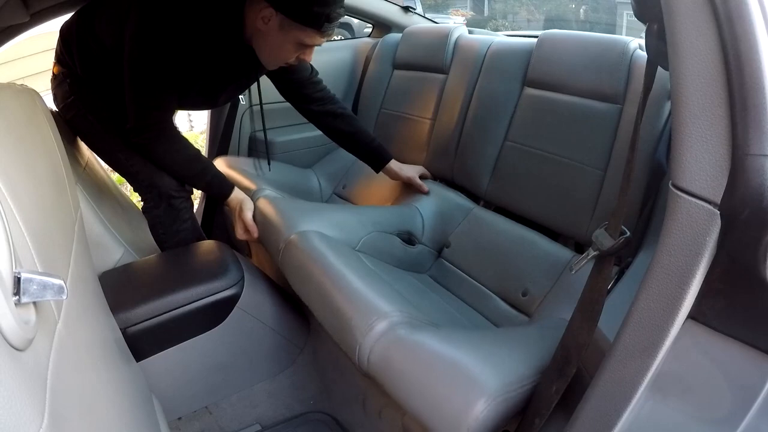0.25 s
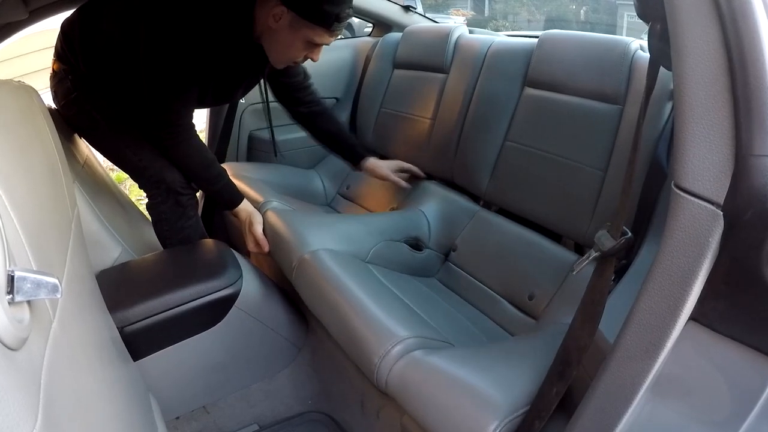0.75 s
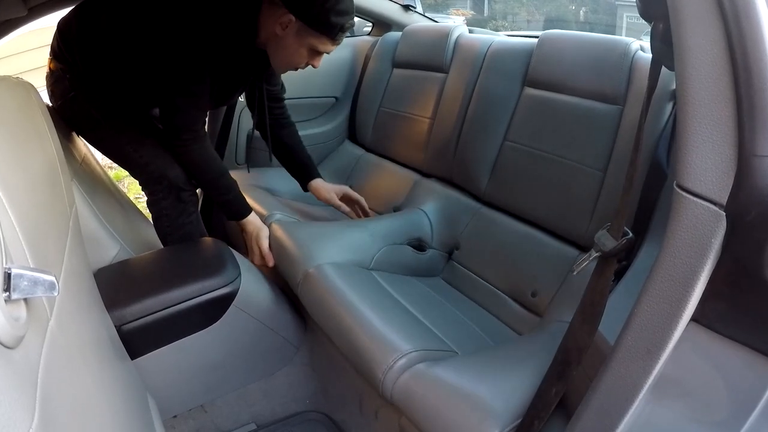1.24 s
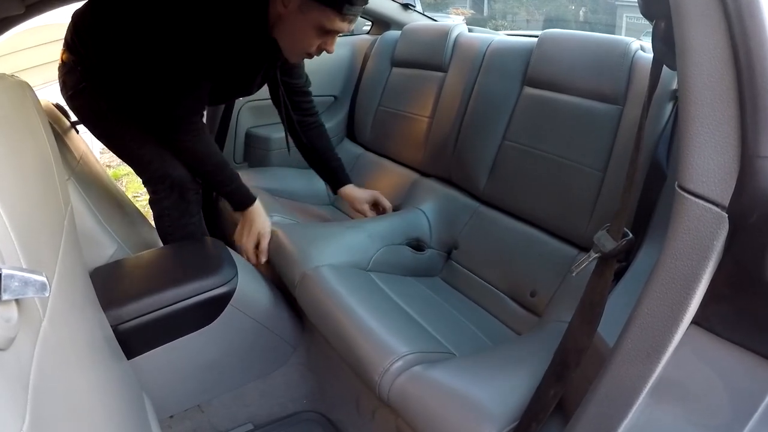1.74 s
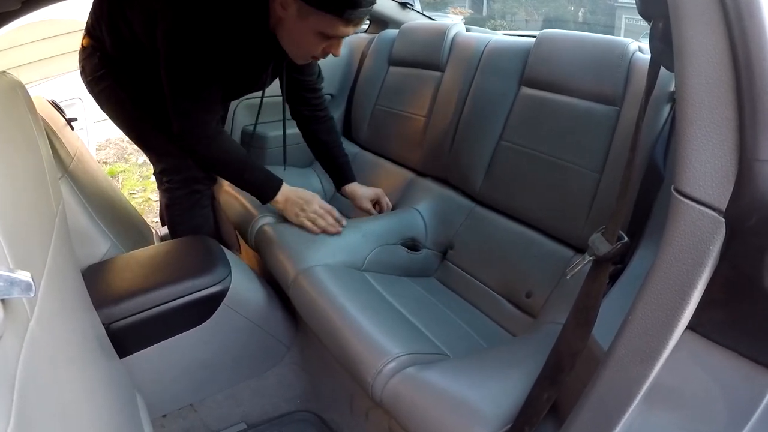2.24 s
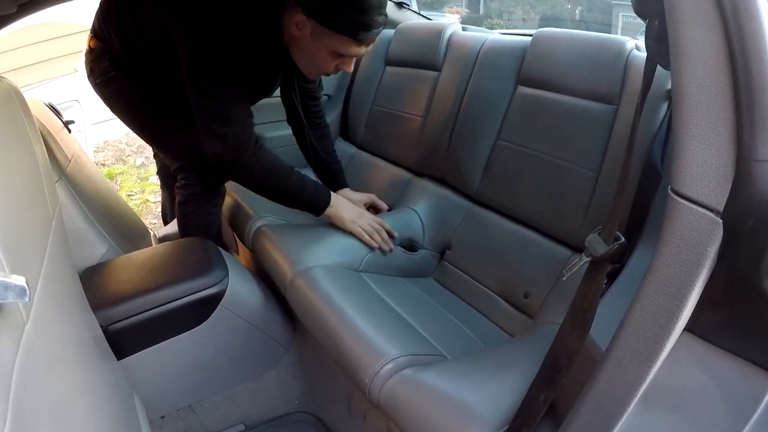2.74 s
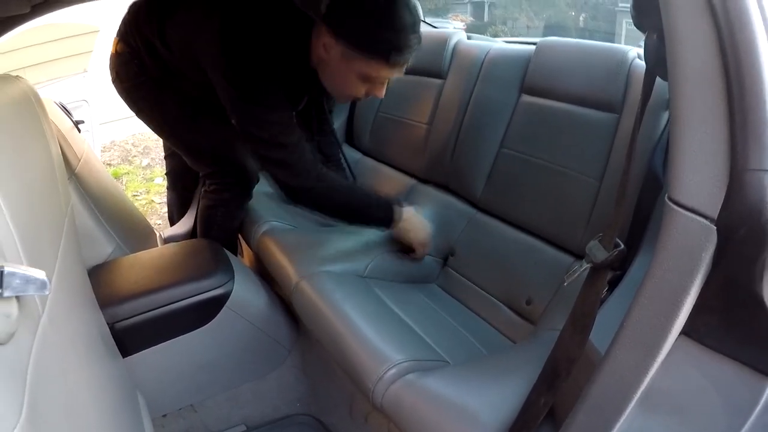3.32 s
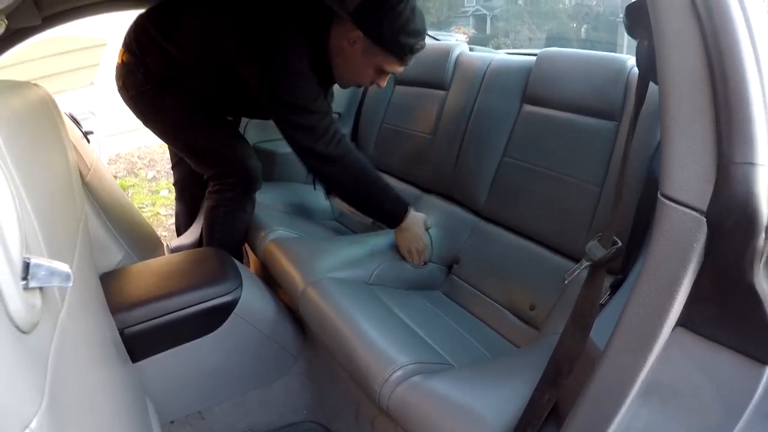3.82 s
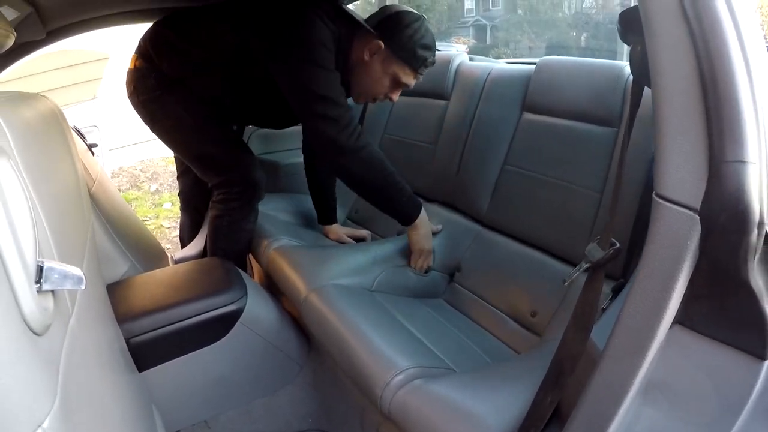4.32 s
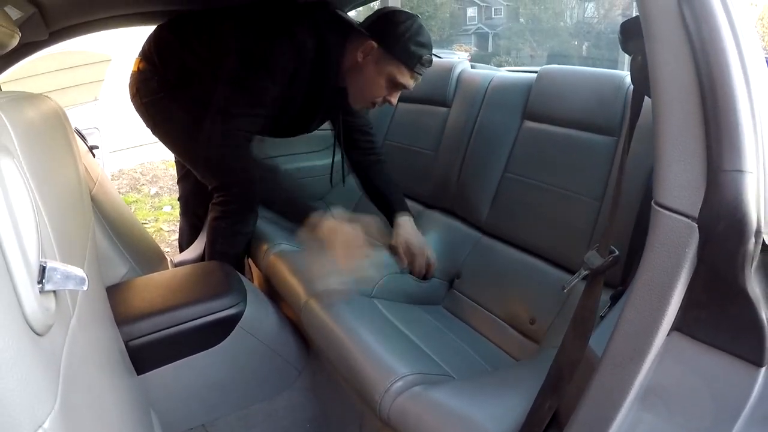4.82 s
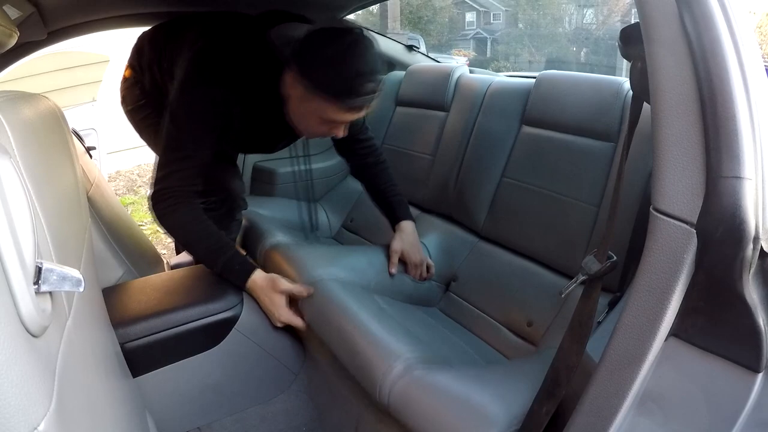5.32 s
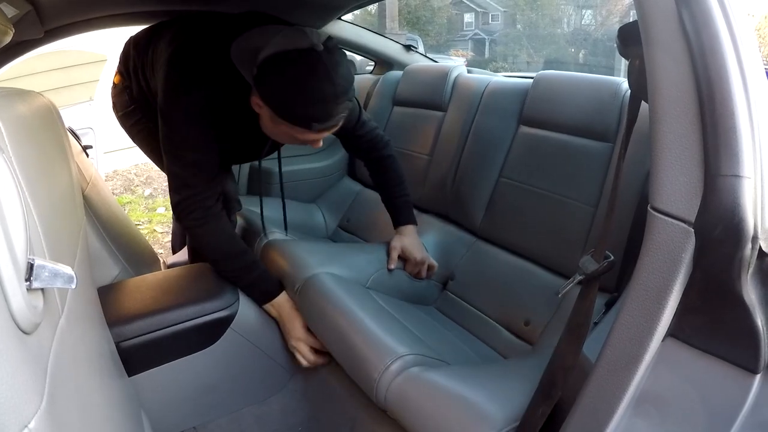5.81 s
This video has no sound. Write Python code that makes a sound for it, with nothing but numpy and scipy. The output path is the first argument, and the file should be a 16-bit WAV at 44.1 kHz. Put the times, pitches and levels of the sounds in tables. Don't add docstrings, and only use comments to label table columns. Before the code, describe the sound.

Close inside a parked car with an open door, hands push a leather seat cushion into place. Low rocking and booms mix with creaks, sleeve rustle and tiny ticks. A bird chirps outside as the frame knocks sharply. After a quieter stretch of rubbing, knocks, skids and thumps crowd together and a strap scrapes through its slot. The bird calls again, then final shoves bring more hard knocks. Close stereo microphone, short dull cabin reflections.

```python
import sys
import numpy as np
from scipy import signal
from scipy.fft import rfft, irfft, next_fast_len
from scipy.io import wavfile

SR = 44100
rng = np.random.default_rng(int(sys.argv[2]) if len(sys.argv) > 2 else 0)


def store_pcm(level_fs):
    pcm = np.round(np.clip(level_fs, -1, 1) * 32767).astype(np.int16)
    wavfile.write(sys.argv[1], SR, np.atleast_2d(pcm).T)


def undo_db(level):
    steps = np.asarray(level, float) / 20
    return 10 ** steps


N = 267422

# frequency in Hz, density in dB per Hz.
AIR_SPECTRUM = [(35, -23), (60, 0.5), (240, 2), (330, -17.5), (600, -20), (1300, -25), (1650, -30),
                (3000, -37), (6000, -42.5), (9000, -38.5), (12500, -35), (15000, -7)]
SWAY_SPECTRUM = [(11, -57), (18, 1.5), (43, -1.5), (110, -8), (140, -61), (240, -120)]
BOOM_SPECTRUM = [(45, -53), (75, -26), (110, -5.5), (150, 4), (200, -1.5), (255, 1.5), (290, -3.5),
                 (340, -12), (500, -18), (900, -17.5)]
CREAK_SPECTRUM = [(200, -22), (330, 2), (500, -4.5), (720, -5.5), (900, -10.5), (1650, -9.5), (2300, -14),
                  (3300, -21.5), (6000, -22.5)]
SWISH_SPECTRUM = [(1300, 12.5), (2200, 2), (3500, 3.5), (4800, 3.5), (6000, 5), (7500, 0.5), (8400, -5.5),
                  (11000, -10.5), (15000, 1.5)]
AIR_DB = -36.5

# start in seconds, length in seconds, top in Hz, level in dB.
ARCHES = [
    (1.28, 0.11, 5000, -50.5),
    (1.452, 0.11, 5240, -50.5),
    (1.963, 0.087, 5300, -53.5),
]
# start in seconds,
# length in seconds, from in Hz, to in Hz, level in dB.
GLIDES = [(1.108, 0.053, 5700, 7100, -51), (1.12, 0.11, 4360, 4400, -53), (1.3, 0.06, 8300, 7450, -58),
          (1.465, .1, 5180, 5160, -56), (1.302, 0.079, 4600, 4400, -57.5), (1.48, .045, 7600, 7300, -58),
          (4.289, 0.063, 5160, 6400, -44), (4.316, 0.065, 6880, 6880, -46), (4.308, 0.02, 5600, 5000, -42),
          (4.309, 0.09, 3700, 3780, -36.5), (4.416, 0.032, 3830, 3600, -51.5),
          (4.458, 0.045, 3800, 3760, -49), (4.39, 0.205, 3800, 3790, -58), (4.61, 0.058, 3500, 3920, -49.5),
          (4.648, 0.051, 3600, 3710, -51), (4.623, 0.034, 6730, 6870, -61), (4.745, .13, 4370, 4350, -56),
          (4.9, 0.093, 4400, 4330, -54), (4.78, .06, 1720, 1900, -60)]
ARCH_FOOT_HZ, ARCH_TOP_SHARE, GLIDE_SHARE = 4410, 0.3, 0.35
LOUDEST_SHARE, ONSET_DB, FADE_DB = 0.33, -4, -28
ARCH_HARSHNESS, GLIDE_HARSHNESS = 0.8, 0.42

# start in seconds, peak in dB, ring in Hz.
TICKS = [(0.349, -47, 5200), (0.372, -46, 4230), (0.406, -47.5, 3900), (0.416, -48, 4000),
         (0.458, -41, 800), (0.47, -50, 4300), (0.484, -40, 1000), (0.54, -50, 5400), (0.595, -49, 4100),
         (1.401, -47, 905), (2.691, -50, 800), (3.524, -31, 1670), (3.543, -30, 1760), (3.58, -30.5, 1080),
         (3.614, -32, 1700), (3.662, -35, 1900), (3.674, -36, 2400), (3.688, -43, 1212), (3.727, -46, 1030),
         (3.777, -38, 2030), (3.797, -32, 2010), (3.886, -29, 2360), (3.945, -31, 2300), (3.999, -41, 1120),
         (4.17, -43, 690), (4.408, -37.5, 4530), (4.57, -37.5, 3060), (4.659, -51, 6500),
         (4.78, -32.5, 1740), (5.241, -31.5, 654.6), (5.326, -38.5, 700), (5.385, -37, 895),
         (5.619, -32, 1520), (5.821, -41.5, 670), (5.908, -29.5, 724), (6.024, -39, 795)]
TICK_CYCLES, TICK_SCRAPE_S, TICK_CLICK_DB = 18, 0.0023, -16

# time in seconds, slips per second, level in dB, pitch ratio (tension).
STRAP = [
    (3.64, 42, -50, .94),
    (3.7, 40, -49, .96),
    (3.76, 45, -48, .975),
    (3.82, 60, -47, .99),
    (3.88, 100, -46, 1.0),
    (3.95, 130, -46, 1.01),
    (3.99, 130, -65, 1.01),
]
# frequency in Hz, T60 in seconds, level in dB.
SLOT_MODES = [(2050, .01, -5), (2480, .012, -4), (3450, .018, 0)]

# start in seconds, length in seconds, level in dB, dullness in Hz.
SKIDS = [(0.127, 0.087, -48.5, 2430), (0.619, 0.057, -46, 4100), (4.551, 0.095, -50, 3460),
         (1.118, 0.039, -36.5, 1100), (1.416, 0.17, -53.5, 1180), (1.623, 0.023, -27, 3150),
         (2.726, 0.029, -43, 5140), (3.08, 0.11, -39.5, 2260), (3.336, 0.033, -37.5, 3300),
         (3.483, 0.014, -39.5, 2000), (3.894, 0.073, -38.5, 3180), (4.15, 0.13, -35.5, 2120),
         (4.77, 0.076, -47, 2350), (5.47, 0.039, -36.5, 2600), (6.03, 0.056, -36.5, 3050),
         (0.259, 0.03, -42, 794), (3.371, 0.021, -37, 1490), (3.56, 0.036, -43, 2510),
         (3.846, 0.044, -42.5, 2500)]

# centre in seconds, peak in dB, frequency in Hz, width in seconds.
LURCHES = [(0.772, -18, 60, 0.017), (0.846, -22.5, 65, 0.014), (0.912, -17, 259, 0.0068),
           (1.053, -16, 55.4, 0.017), (1.06, -13.5, 180, 0.008), (1.107, -15.5, 42, 0.028),
           (1.234, -19.5, 50, 0.016), (1.489, -26, 57, 0.016), (1.64, -13, 260, 0.015),
           (1.889, -23, 55.3, 0.029), (2.953, -16.5, 205, 0.0097), (3.082, -17.5, 57, 0.025),
           (3.415, -26.5, 55, 0.017), (3.511, -19, 179, 0.011), (3.653, -12, 58.7, 0.025),
           (3.744, -13, 61.7, 0.018), (3.862, -20, 64, 0.017), (3.894, -16.5, 164, 0.0094),
           (3.924, -11.5, 47, 0.026), (3.961, -11, 191, 0.012), (3.983, -17, 42.7, 0.029),
           (4.059, -25, 43, 0.02), (4.096, -14.5, 215, 0.01), (4.134, -22, 220, 0.0037),
           (4.164, -17.5, 187, 0.013), (4.221, -20, 175, 0.0071), (4.22, -10.5, 49, 0.028),
           (4.267, -14, 220, 0.0074), (4.465, -15, 203, 0.0082), (5.022, -21.5, 71, 0.023),
           (5.155, -18, 55.6, 0.018), (5.216, -21.5, 58, 0.035), (5.356, -12.5, 254, 0.01),
           (5.396, -20.5, 66, 0.014), (5.497, -17, 180, 0.0095), (5.516, -18, 61.4, 0.018),
           (5.66, -21, 68, 0.014), (5.675, -13, 214, 0.0063)]
LURCH_DB, LURCH_TAIL_RATIO = -2.5, 1.3

# start in seconds, peak in dB, ring in Hz, thud in dB.
KNOCKS = [(0.161, -30, 470, 1.5), (0.254, -29.5, 450, 1), (0.639, -32.5, 306, 2.5), (0.712, -32, 520, 0.5),
          (0.903, -20, 775, -4), (1.021, -31.5, 630, -9), (1.048, -27.5, 527, 2.5), (1.24, -35.5, 636, 7.5),
          (1.601, -16.5, 830, -9), (1.624, -20.5, 600, -2), (2.472, -26.5, 620, -4),
          (2.526, -32.5, 633, -4), (3.103, -32.5, 604, 4), (3.347, -23.5, 1830, -13.5),
          (3.368, -19, 990, -19), (3.446, -34.5, 2700, -24), (3.469, -19, 1870, -15),
          (3.494, -24.5, 710, -6), (3.57, -36, 2330, 4), (3.631, -26.5, 2060, -5), (3.91, -28, 633, -15),
          (4.11, -22, 614, -2.5), (4.342, -31, 616, 4), (4.459, -24, 603, -0.5), (5.224, -34.5, 587, -4.5),
          (5.307, -41, 1840, -25.5), (5.345, -17.5, 770, -6), (5.654, -16.5, 580, -13),
          (5.776, -35, 1830, -2), (6.058, -16, 1590, -38)]
# start in seconds, peak in dB, thud in dB.
BUMPS = [(0.479, -47, 8), (0.822, -55, 23), (1.127, -38.5, 13), (1.452, -39.5, 7), (1.491, -40.5, 14),
         (1.691, -43.5, 12.5), (2.949, -33.5, 9.5), (3.221, -36, 7), (3.412, -40, 12), (3.541, -33, -2),
         (4.091, -28.5, 5), (4.483, -27, 4), (5.856, -36, 5.5)]
# start in seconds, peak in dB, ring in Hz, crack in dB.
SNAPS = [(0.625, -46, 500, 9), (1.413, -37.5, 620, -7), (1.801, -41.5, 653, -1), (2.085, -40.5, 540, 0),
         (2.428, -37, 640, -8), (2.585, -37.5, 580, 1), (2.72, -37, 490, 11), (3.075, -32, 494, 3.5),
         (3.309, -29, 1320, 14.5), (4.984, -48, 584, -22), (5.485, -27, 710, -4), (5.574, -37.5, 890, 16),
         (6.05, -31, 1130, 15.5)]
# time in seconds, left over right in dB.
HAND = [(0.0, 1), (1.05, -0.5), (1.6, -4.5), (2.1, 9.5), (2.9, -18), (3.1, 10), (3.3, -10), (3.65, -6.5),
        (3.9, -2), (4.5, -1.5), (5.35, -3.5), (6.06, -7.5)]
KNOCK_CRACK_DB, BUMP_RING_HZ, BUMP_CRACK_DB, SNAP_THUD_DB = -18.5, 580, -15, -8
CABIN_T60_S, CABIN_CUT_HZ = 0.072, 5500

# time in seconds, hand pressure as creak in dB, leaned weight as sway in dB.
EFFORT = [(0.0, -57, -63), (0.4, -56, -48), (0.74, -49, -31), (0.86, -60.5, -36.5), (1.1, -42, -29.5),
          (1.25, -64, -29), (1.55, -50, -48), (1.87, -56.5, -33), (2.3, -49.5, -42.5), (2.8, -48.5, -54),
          (3.21, -41.5, -31.5), (3.3, -48, -40.5), (3.57, -41, -24.5), (3.8, -47.5, -25.5),
          (4.32, -38.5, -32.5), (4.6, -55, -32), (5.45, -41.5, -40.5), (6.06, -43.5, -33.5)]
# peak in seconds, fall of 10 dB in seconds, sway in dB, boom in dB.
SHOVES = [(0.0, 1.05, -35, -70), (0.18, 0, -28, -31.5), (0.0, -0.03, -25.5, -63), (0.3, 0, -36, -38),
          (0.66, -0.03, -42, -33), (0.759, 0.17, -27, -34), (1.09, 0.1, -23, -28), (1.22, 0.09, -33, -32),
          (1.47, 0.07, -26.5, -28), (1.62, 0.13, -55, -33), (1.75, -0.1, -32, -47),
          (1.89, 0.13, -32, -41.5), (2.09, 0.1, -44, -37), (2.48, 0.3, -38, -34.5),
          (2.95, 0.31, -57, -37.5), (3.08, 0.12, -31, -31), (3.49, 0.47, -45.5, -31),
          (3.659, .04, -23, -33), (3.75, 0.06, -34, -32), (3.889, 0.07, -29, -21.5),
          (3.968, 0.04, -28, -38), (4.15, 0.21, -36, -24), (4.243, 0.05, -20, -20), (4.48, -0.6, -49, -46),
          (4.85, -0.22, -40, -35.5), (5.1, 0.66, -30, -43), (5.22, 0.06, -30, -30.5),
          (5.381, 0.07, -34, -27.5), (5.497, 0.09, -27.5, -27), (5.9, 0.1, -38, -32),
          (5.67, 0.06, -25.5, -28)]
# fastest in seconds, rise and fall of 10 dB in seconds, swish in dB.
STROKES = [(0.0, .05, 0, -56.5), (0.17, 0.1, -0.14, -53), (0.66, 0, -1, -60.5), (0.91, 0.13, -0.2, -54),
           (1.06, 0.09, 0.2, -46.5), (1.15, 1, -6, -68), (1.48, 0.2, 2, -56), (1.647, 0.0272, 0.04, -34.5),
           (1.96, 0.06, 0, -45.5), (2.3, 0.1, 0.2, -48), (2.73, 0.01, 0.22, -46.5),
           (2.88, -0.05, 0.07, -47.5), (3.11, -0.2, 0, -44.5), (3.31, .015, 0.1, -39),
           (3.47, -0.37, -1, -48), (3.58, -1.13, -0.33, -39), (3.63, -0.55, -0.46, -30),
           (3.97, 0.07, 0.02, -41.5), (4.12, -7, 0.2, -55), (4.22, 0, 0.18, -43.5), (4.33, 0.1, 0.07, -47),
           (4.47, 0.17, 0.07, -47.5), (4.64, 0, 0.15, -49), (4.83, -2.05, -0.6, -43),
           (5.17, 0.33, 3.5, -49.5), (5.49, 0.03, .1, -42.5), (5.91, -0.1, 2, -45.5),
           (5.59, -0.14, -0.15, -43), (5.65, 0, -0.05, -35), (6.04, 0.1, -2, -45), (6.06, 0.05, .05, -41)]
SHOVE_RISE_RATIO = 0.57
BOOM_UNDER_SWAY_DB, SWISH_UNDER_CREAK_DB = -8, -25

# frequency in Hz, lead of left in radians.
PORT_PHASE = [(200, .2), (400, .3), (650, 1.2), (950, 1.7), (1640, 1.5), (2240, 1.3), (3530, 0.0),
              (5700, 0.2), (7600, -1.9), (8800, -1.6), (10200, 0.3), (13700, .4), (14200, 3.2)]
# frequency in Hz, left over right in dB.
PORT_TILT = [(60, -1.5), (110, -1.5), (200, -3.5), (380, -1.5), (700, -2.5), (1280, -1.5), (2370, -0.5),
             (4370, 0.5), (8050, -3), (14900, -1)]
MIC_TOP_HZ = 11700


def rms_one(x):
    return x / np.sqrt(np.mean(x ** 2) + 1e-20)


def peak_one(x):
    return x / (np.max(np.abs(x)) + 1e-12)


def add(out, start_s, sound):
    i = int(start_s * SR)
    out[:, i:i + sound.shape[1]] += sound[:, :N - i]


def in_time(rows):
    s, *columns = np.transpose(rows)
    return [np.interp(np.arange(N) / SR, s, c) for c in columns]


def at_hz(points, hz):
    table_hz, value = np.transpose(points)
    return np.interp(np.log(hz), np.log(table_hz), value)


def low_pass(x, order, hz):
    return signal.sosfilt(signal.butter(order, hz, fs=SR, output="sos"), x)


def band_pass(x, order, low_hz, high_hz):
    return signal.sosfilt(signal.butter(order, [low_hz, high_hz], "band", fs=SR, output="sos"), x)


def drift(rate_hz):
    r = np.exp(-80 * np.pi * rate_hz / SR)
    slow = signal.lfilter([1], [1, -2 * r, r * r], rng.standard_normal(N // 40 + 2002))[2000:]
    return np.interp(np.arange(N) / 40, np.arange(len(slow)), rms_one(slow))


def grains(per_s, spread_db, clump_db):
    size_db = spread_db * np.minimum(rng.exponential(1, (2, N)), 4)
    sizes = undo_db(size_db) * rng.choice([-1, 1], (2, N))
    born = rng.random((2, N)) < per_s * undo_db(clump_db * drift(25)) / SR
    return sizes * born + 1e-9


def pair(two, alike):
    alike = np.clip(alike, 0, 1)
    return np.sqrt(1 + alike) * two[0] + np.sqrt(1 - alike) * two[1] * np.array([[1], [-1]])


def coloured(two, spectrum, patchy_db, alike):
    size = next_fast_len(N)
    octave = np.log2(np.arange(size // 2 + 1) * SR / size + 1)
    shaped = rfft(two, size) * undo_db(at_hz(spectrum, 2 ** octave))
    out = 0
    for centre in np.arange(np.log2(spectrum[1][0]), np.log2(spectrum[-1][0])):
        overlap = np.clip(1 - np.abs(octave - centre), 0, 1)
        out = out + irfft(shaped * overlap, size)[:, :N] * undo_db(patchy_db * drift(5.9))
    return rms_one(pair(out, alike))


def ring(x, hz, t60_s):
    r, w = undo_db(-60 / (t60_s * SR)), 2 * np.pi * hz / SR
    return signal.lfilter([0, np.sin(w)], [1, -2 * r * np.cos(w), r * r], x)


def sliding_ring(x, hz, t60_s):
    turn = np.exp(2j * np.pi * np.cumsum(hz) / SR)
    return np.real(turn * signal.lfilter([1], [1, -undo_db(-60 / (t60_s * SR))], x / turn))


def swells(rows):
    t = np.arange(0, N + 64, 64)[None] / SR
    s, rise_s, fall_s, peak_db = np.transpose(rows)[:, :, None]
    before = (s - t) / np.maximum(rise_s, 1e-3)
    after = (t - s) / np.maximum(fall_s, 1e-3)
    level = undo_db(peak_db - 10 * np.maximum(before, after))
    return np.interp(np.arange(N) / SR, t[0], np.sqrt(np.sum(level ** 2, axis=0)))


def air():
    noise = rng.standard_normal((2, N))
    return undo_db(AIR_DB - 4.5) * coloured(noise, AIR_SPECTRUM, patchy_db=1.0, alike=.42)


def notes():
    paths = []
    for s, length_s, top_hz, db in ARCHES:
        path_hz = [ARCH_FOOT_HZ, top_hz, 1.04 * ARCH_FOOT_HZ, ARCH_FOOT_HZ]
        paths.append((s, length_s, [0, ARCH_TOP_SHARE, 2 * ARCH_TOP_SHARE, 1], path_hz, db))
    for s, length_s, from_hz, to_hz, db in GLIDES:
        paths.append((s, length_s, [0, GLIDE_SHARE, 1], [from_hz, to_hz, to_hz], db))
    share = np.linspace(0, 1, 21)
    swell_db = np.interp(share, [0, LOUDEST_SHARE, 2 * LOUDEST_SHARE, 1], [ONSET_DB, 0, -4.5, FADE_DB])
    return [np.transpose([s + length_s * share, np.interp(share, at, hz), db + swell_db])
            for s, length_s, at, hz, db in paths]


def bird():
    dry = np.zeros((1, N))
    flutter = rms_one(low_pass(rng.standard_normal(N), 2, 330))
    for k, note in enumerate(notes()):
        s, hz, level_db = np.transpose(note)
        t = np.arange(s[0], s[-1], 1 / SR)
        harsh = ARCH_HARSHNESS if k < len(ARCHES) else GLIDE_HARSHNESS
        voice = np.sqrt(1 - harsh ** 2) + harsh * flutter[(t * SR).astype(int)]
        edge = np.clip(np.minimum(t - s[0], s[-1] - t) / 0.0023, 0, 1)
        tone = np.sin(2 * np.pi * np.cumsum(np.interp(t, s, hz)) / SR)
        gain = np.sqrt(2) * edge * undo_db(np.interp(t, s, level_db) + 1.0)
        add(dry, s[0], (gain * voice * tone)[None])
    scatter = rng.standard_normal((2, 6000)) * np.exp(-np.arange(6000) / SR / 0.014)
    scatter /= np.sqrt(np.sum(scatter ** 2, axis=1))[:, None]
    return 0.69 * dry + 0.84 * signal.fftconvolve(dry, scatter, axes=1)[:, :N]


def cabin(x):
    t = np.arange(int(.2 * SR)) / SR
    tail = rng.standard_normal((2, len(t))) * undo_db(-60 * t / CABIN_T60_S) * (t > .002)
    tail = low_pass(tail, 1, CABIN_CUT_HZ)
    tail /= np.sqrt(np.sum(tail ** 2) / 2)
    return signal.fftconvolve(x.mean(axis=0, keepdims=True), tail, axes=1)[:, :N]


def ticks():
    out, t = np.zeros((2, N)), np.arange(int(.05 * SR)) / SR
    for s, peak_db, hz in TICKS:
        scrape = pair(rng.standard_normal((2, len(t))), 1.0) * np.exp(-t / TICK_SCRAPE_S)
        click = band_pass(scrape, 1, .4 * hz, min(3 * hz, 14000))
        pan_db = np.interp(s, *np.transpose(HAND)) / 4
        sound = peak_one(ring(scrape, hz, TICK_CYCLES / hz)) + undo_db(TICK_CLICK_DB) * peak_one(click)
        add(out, s, undo_db(peak_db) * sound * undo_db([[pan_db], [-pan_db]]))
    return out


def strap():
    per_s, level_db, tension = in_time(STRAP)
    start_s, end_s = STRAP[0][0], STRAP[-1][0]
    moving = np.abs(np.arange(N) / SR - (start_s + end_s) / 2) < (end_s - start_s) / 2
    slips = np.diff(np.floor(np.cumsum(per_s * undo_db(1.2 * drift(24))) / SR), prepend=0)
    scratch = signal.lfilter([1], [1, -.985], slips) * rng.standard_normal((2, N))
    scratch = scratch + .05 * rng.standard_normal((2, N))
    rung = sum(undo_db(db) * sliding_ring(scratch, hz * tension, t60_s) for hz, t60_s, db in SLOT_MODES)
    return moving * undo_db(level_db) * rms_one(pair(rung, 0.28))


def skids():
    out = np.zeros((2, N))
    high = signal.butter(1, 450, "high", fs=SR, output="sos")
    for s, length_s, level_db, dull_hz in SKIDS:
        t = np.arange(int(length_s * 1.3 * SR)) / SR / length_s
        grit = rng.standard_normal((2, 10000))[:, :len(t)] ** 3
        grit = low_pass(signal.sosfilt(high, grit), 2, dull_hz)
        grit = grit + undo_db(-15) * ring(grit, .87 * dull_hz, .0035)
        hump = np.sin(np.pi * np.clip(t, 0, 1) / 1.2) ** 1.07 * np.exp(-np.maximum(t - 1, 0) * 7.0)
        add(out, s, undo_db(level_db) * hump * rms_one(pair(grit, 0.64)))
    return out


def lurches():
    out, t = np.zeros((2, N)), np.arange(-.1, .15, 1 / SR)
    for s, peak_db, hz, width_s in LURCHES:
        turn, apart = rng.uniform(-1, 1, 2)
        side_s = np.clip(width_s, .004, .06) * np.where(t > 0, LURCH_TAIL_RATIO, 1)
        hump = np.exp(-np.log(2) * (2 * t / side_s) ** 2)
        phase = np.pi * turn + .8 * apart * np.array([[1], [-1]])
        add(out, s - .1, undo_db(peak_db + LURCH_DB) * hump * np.sin(2 * np.pi * hz * t + phase))
    return out


def contacts():
    rows = [(*knock, KNOCK_CRACK_DB) for knock in KNOCKS]
    rows += [(s, db, BUMP_RING_HZ, thud_db, BUMP_CRACK_DB) for s, db, thud_db in BUMPS]
    rows += [(s, db, hz, SNAP_THUD_DB, crack_db) for s, db, hz, crack_db in SNAPS]
    return [(*row, np.interp(row[0], *np.transpose(HAND))) for row in rows]


def knocks():
    out, t = np.zeros((2, N)), np.arange(int(.12 * SR)) / SR
    for s, peak_db, hz, thud_db, crack_db, pan_db in contacts():
        noise = rng.standard_normal((3, len(t)))
        rattle = noise[0] ** 3 * np.exp(-t / (0.0092 * min(750 / hz, 1.3) ** 0.44))
        rattle[:12] += 4.0
        clatter = low_pass(band_pass(rattle, 2, 330, min(2.85 * hz, 2900)), 2, 6000)
        part = 0.67 * peak_one(ring(rattle, hz, 13 / hz)) + min(hz / 620, 1) ** 3 * peak_one(clatter)
        soft = np.sin(np.pi * np.clip(t / 0.0029, 0, 1)) + 1.33 * noise[1] * np.exp(-t / 0.016)
        thud = ring(soft, 254, 0.041) + 0.5 * ring(soft, 157, 0.036) + ring(soft, 403, 0.057)
        thud = peak_one(thud + 0.82 * ring(soft, 296, 0.034) + 0.38 * ring(soft, 530, 0.018))
        burst = rattle * .4 + noise[2] * np.exp(-t / .006)
        crack = peak_one(band_pass(burst, 3, 2200, np.clip(8.6 * hz, 7000, 14500)))
        sound = peak_one(part) + undo_db(thud_db + 3.5) * thud + undo_db(crack_db - 10.0) * crack
        sides = undo_db([[(pan_db + 11.0) / 2], [-(pan_db - 8.5) / 2]])
        add(out, s, undo_db(peak_db + 1.5) * sound * sides)
    return out


def body():
    weight = undo_db(in_time(EFFORT)[1])
    sway = coloured(rng.standard_normal((2, N)), SWAY_SPECTRUM, patchy_db=2.25, alike=.75)
    boom = coloured(grains(500, spread_db=3.0, clump_db=3.0), BOOM_SPECTRUM, patchy_db=1.2, alike=.45)
    shoves = [(s, max(fall_s, .03), sway_db, boom_db) for s, fall_s, sway_db, boom_db in SHOVES]
    rocked = swells([(s, SHOVE_RISE_RATIO * fall_s, fall_s, db) for s, fall_s, db, _ in shoves])
    struck = swells([(s, SHOVE_RISE_RATIO * fall_s, fall_s, db) for s, fall_s, _, db in shoves])
    return np.hypot(weight, rocked) * sway + np.hypot(undo_db(BOOM_UNDER_SWAY_DB) * weight, struck) * boom


def rubbing():
    pressure = undo_db(in_time(EFFORT)[0])
    creak = coloured(grains(1600, spread_db=3.8, clump_db=3.5), CREAK_SPECTRUM, patchy_db=1.5, alike=.62)
    swish = coloured(grains(12000, spread_db=2.0, clump_db=1.5), SWISH_SPECTRUM, patchy_db=2.2, alike=.25)
    stroke = np.hypot(undo_db(SWISH_UNDER_CREAK_DB) * pressure, swells(STROKES))
    return pressure * creak + stroke * swish


def scene():
    hits = knocks() + skids()
    outside = air() + bird()
    return outside + undo_db(-10.0) * cabin(hits) + ticks() + strap() + lurches() + hits + body() + rubbing()


def roll_off(x):
    return signal.sosfilt(signal.butter(12, 15300, fs=SR, output="sos"), x)


def record(dry):
    size = next_fast_len(N + 4096)
    hz = np.arange(size // 2 + 1) * SR / size + 1
    half = undo_db(at_hz(PORT_TILT, hz) / 2) * np.exp(.5j * at_hz(PORT_PHASE, hz))
    top = (hz < 15300) / np.sqrt(1 + (hz / MIC_TOP_HZ) ** 8)
    ports = irfft(rfft(dry, size) * top * np.array([half, 1 / half]), size)[:, :N]
    return roll_off(ports)


dry = scene()
out = record(dry)
store_pcm(out)
```